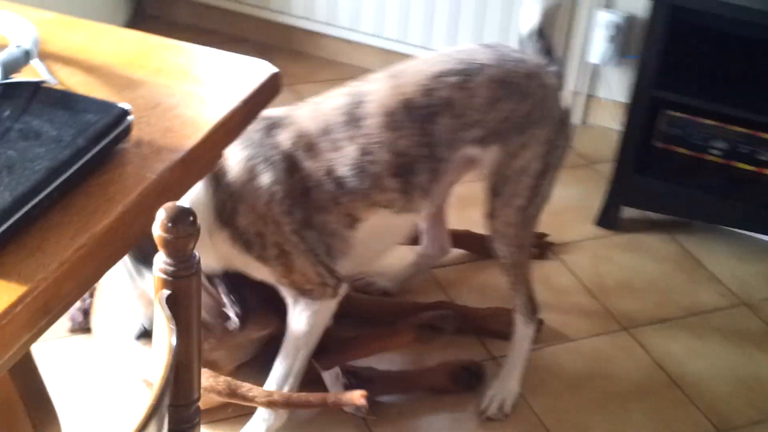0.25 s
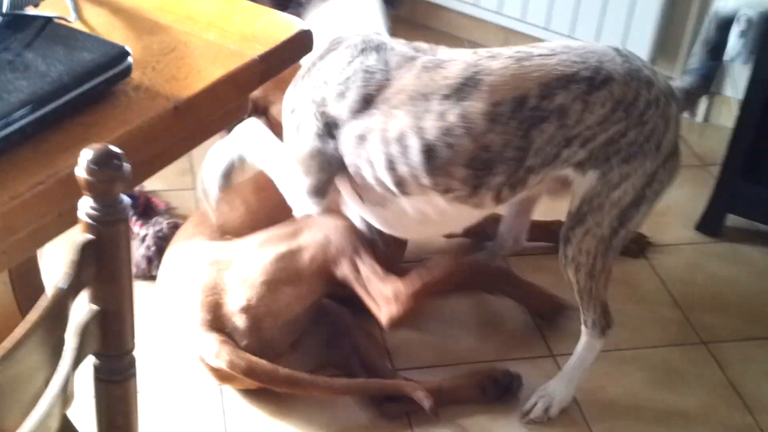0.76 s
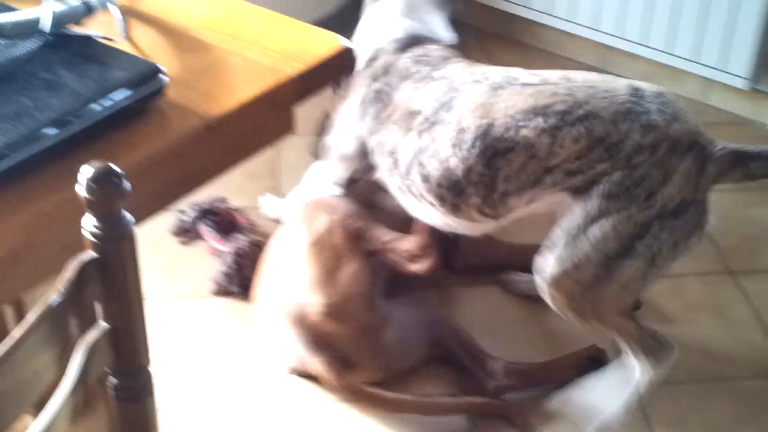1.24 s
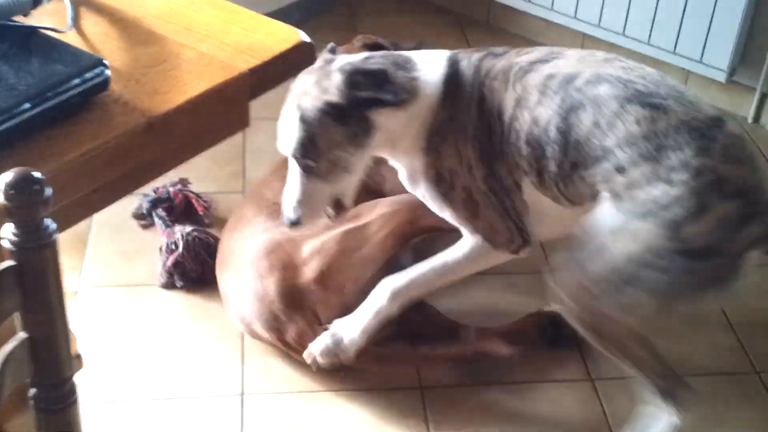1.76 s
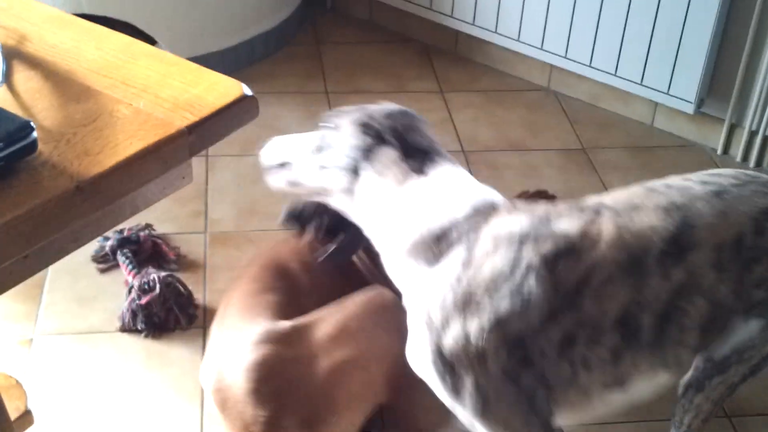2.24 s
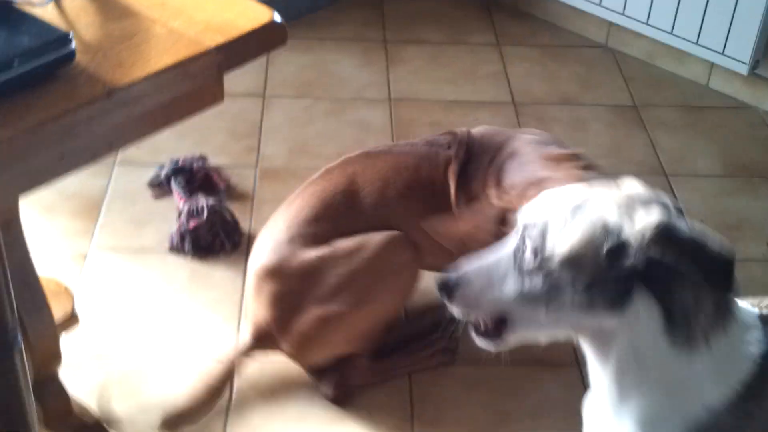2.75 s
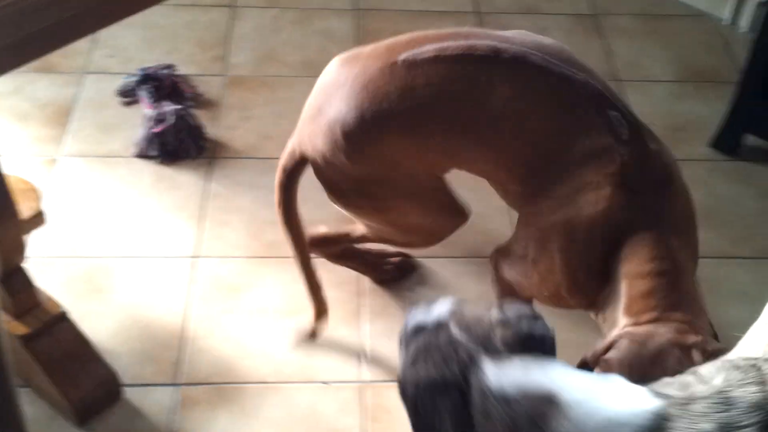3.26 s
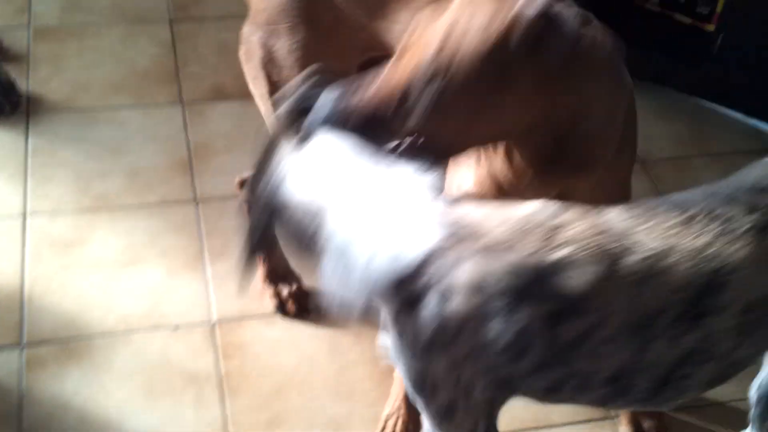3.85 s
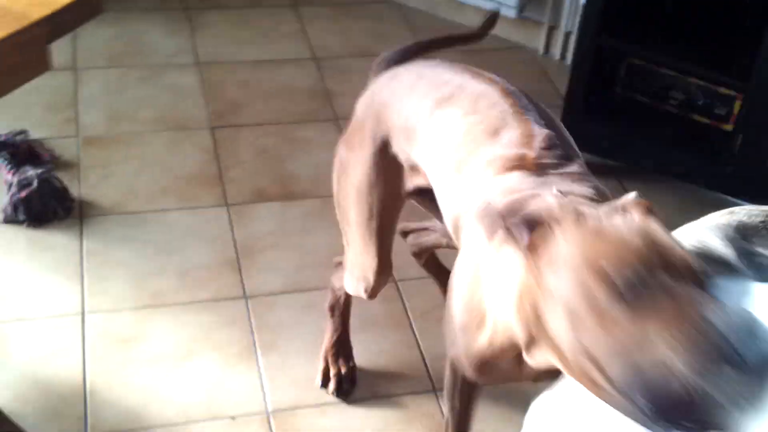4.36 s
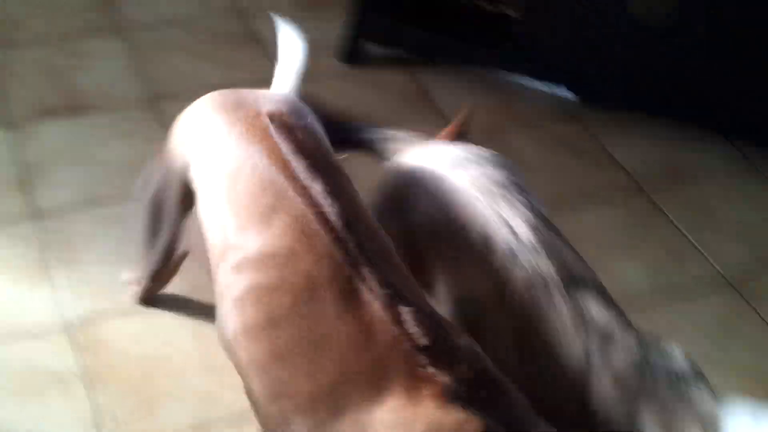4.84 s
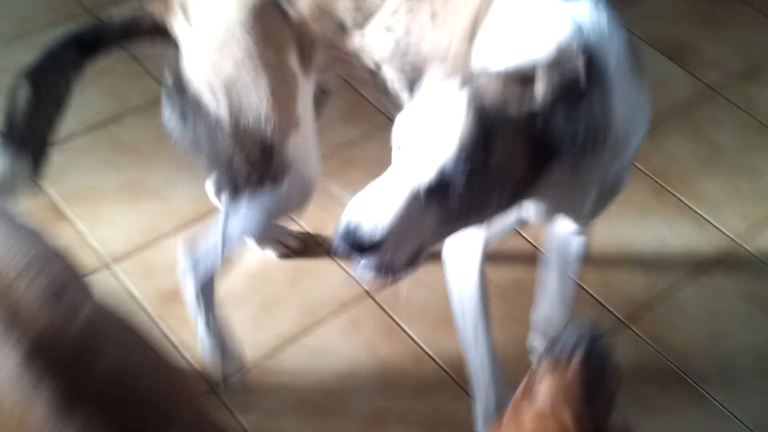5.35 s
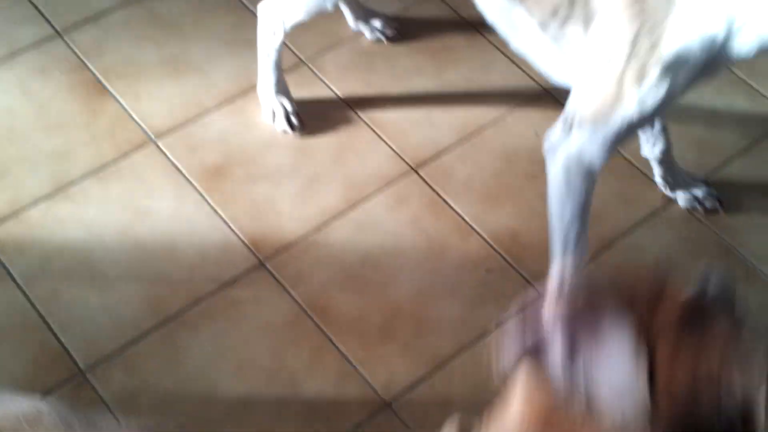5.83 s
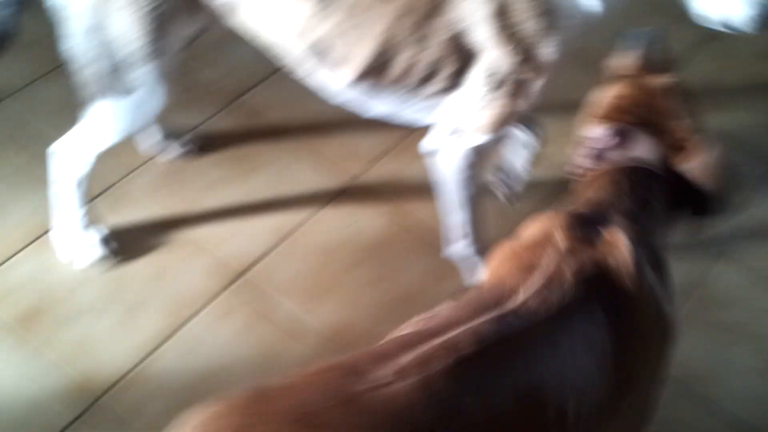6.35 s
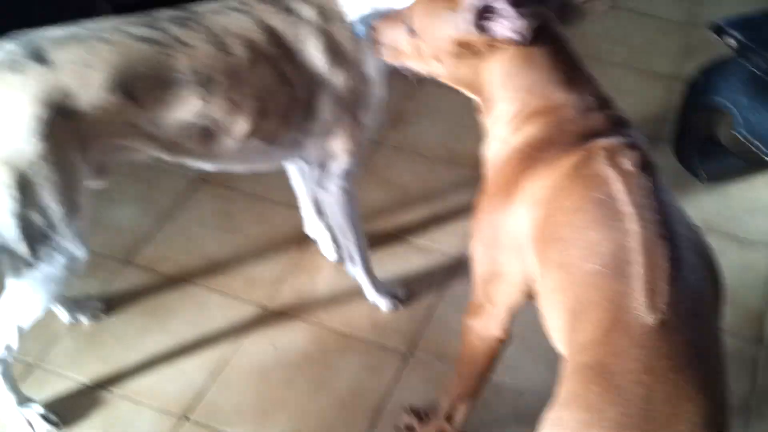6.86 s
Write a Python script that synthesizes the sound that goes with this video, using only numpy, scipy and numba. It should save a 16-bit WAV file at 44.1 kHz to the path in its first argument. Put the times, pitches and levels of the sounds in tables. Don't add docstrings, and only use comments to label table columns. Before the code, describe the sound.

Two dogs scuffle on a hard tiled floor, claws ticking and skidding, with low growls and one very loud, distorted bark late on.

```python
import sys
import numpy as np
from scipy import signal
from scipy.fft import rfft, irfft
from scipy.io import wavfile
from scipy.ndimage import uniform_filter1d
from numba import njit

SR = 44100
rng = np.random.default_rng(int(sys.argv[2]) if len(sys.argv) > 2 else 0)


def decibels_to_gain(level_db):
    exponent = np.asarray(level_db, float) / 20
    return 10 ** exponent


def unload_audio(sound):
    columns = np.transpose(np.atleast_2d(sound))
    steps = np.round(np.clip(columns, -1, 1) * 32767)
    wavfile.write(sys.argv[1], SR, steps.astype(np.int16))


N = 312974
TIME = np.arange(N) / SR


def unit(x):
    return x / np.sqrt(np.mean(x ** 2) + 1e-18)


@njit
def svf(x, hz, width):
    y, b, l = np.empty(len(x)), 0., 0.
    for i in range(len(x)):
        g, k = np.tan(np.pi * hz[i] / SR), width / hz[i]
        v = (b + g * (x[i] - l)) / (1 + g * (g + k))
        b, l, y[i] = 2 * v - b, l + 2 * g * v, k * v
    return y


def band(x, hz, width):
    return svf(x + 1e-18, np.clip(hz, 20, .45 * SR) + np.zeros(len(x)), float(width))


def steep(x, hz, width):
    return band(band(x, hz, width), hz, width)


def coloured(points, count):
    hz, db = np.transpose(points)
    gain = decibels_to_gain(np.interp(np.log(np.fft.rfftfreq(count, 1 / SR) + 1), np.log(hz), db))
    return irfft(rfft(rng.standard_normal(count)) * gain, count)


def flicker(rate):
    k = int(SR / rate)
    return uniform_filter1d(np.repeat(rng.standard_normal(N // k + 1), k), k)[:N]


def played(table, edge=.012):
    s, *columns = np.transpose(table)
    span = slice(int(s[0] * SR), int(s[-1] * SR))
    t = TIME[span]
    gate = np.clip(np.minimum(t - s[0], s[-1] - t) / edge, 0, 1)
    return span, gate, [np.interp(t, s, c) for c in columns]


def swell(start, peak, length, db, rise_db, fall_db):
    return [(start, db - rise_db), (start + peak, db), (start + length, db - fall_db)]


def humps(rows, fall_db):
    power = sum(decibels_to_gain(db - fall_db * np.abs(TIME - s) / half) ** 2 for s, db, half in rows)
    return np.sqrt(power)


def strikes(rows, ring, crackle_db=0):
    out = np.zeros(N + SR)
    t = TIME[:SR // 4]
    for s, db, hz, width, push in rows:
        grains = decibels_to_gain(crackle_db * rng.exponential(size=len(t) // 25)).repeat(25)
        burst = rng.standard_normal(len(t)) * grains * np.exp(-t / max(push, 1e-4))
        hit = ring(burst, hz, width)
        out[int(s * SR):][:len(t)] += decibels_to_gain(db) * hit / np.abs(hit).max()
    return out[:N]


# (start [s], length [s], level [dB], first mouth resonance [Hz], last mouth resonance [Hz])
BREATHS = [(0, 0.11, -55, 970, 920), (1.07, 0.28, -47.5, 923, 1180), (1.55, 0.15, -51, 840, 950),
           (2.1, 0.12, -38, 943, 854), (2.36, 0.041, -35.5, 940, 950), (2.394, 0.11, -31.5, 1040, 990),
           (2.47, 0.18, -37, 920, 940), (2.643, 0.14, -40, 950, 920), (2.76, 0.24, -46, 930, 880),
           (4.101, 0.28, -40, 1007, 1120), (4.598, 0.14, -36.5, 780, 826), (6.204, 0.12, -47.5, 1307, 1260),
           (6.682, 0.14, -50.5, 1050, 980)]


def pants():
    out = np.zeros(N)
    for start, length, db, first_hz, last_hz in BREATHS:
        course = swell(start, .45 * length, length, db, rise_db=3, fall_db=10)
        span, gate, (db,) = played(course, edge=0.018)
        hz = np.linspace(first_hz, last_hz, len(db))
        air = rng.standard_normal(len(db)) * decibels_to_gain(2.5 * flicker(60)[:len(db)])
        mouth = steep(air, hz, 340)
        moan = decibels_to_gain(-4) * steep(air, hz, 90)
        upper = decibels_to_gain(-4) * steep(air, 1.42 * hz, 380)
        throat = decibels_to_gain(-5.5) * steep(air, .55 * hz, 220)
        out[span] += unit(mouth + moan + upper + throat) * decibels_to_gain(db) * gate
    return out


# (time [s], effort [dB])
WRESTLING = [(0, -54), (.41, -78), (.65, -55.5), (.87, -61), (1.1, -50.5), (1.5, -53), (1.78, -39),
             (2.19, -49.5), (2.63, -44), (3.58, -47.5), (3.9, -46), (4.43, -46.5), (5.2, -47),
             (5.47, -32.5), (6.16, -64.5), (6.3, -50.5), (6.78, -47), (7.09, -65)]
# (fastest at [s], hiss level [dB], half length [s])
BODY_SLIDES = [(.8, -62, .15), (1.2, -34, 0.51), (1.84, -25, 0.16), (2.17, -33.5, 1), (2.63, -25, 0.2),
               (2.98, -32, 0.49), (3.125, -15, 0.06), (3.26, -23.5, 0.53), (3.82, -32.5, 0.44),
               (4.25, -30.5, 0.098), (4.78, -31.5, 0.34), (5.15, -28.5, 0.13), (5.47, -26, 0.65),
               (6.03, -29, 0.11), (6.34, -29.5, 0.17), (6.74, -32.5, 0.22)]
# (heaviest at [s], rumble level [dB], half length [s])
WEIGHT_SHOVES = [(1.32, -47, 0.33), (1.72, -33.5, 0.093), (2.9, -38.5, 0.59), (3.95, -34.5, 0.25),
                 (5.34, -17, 0.19), (6.34, -40, 0.13)]


def drag():
    effort = decibels_to_gain(np.interp(TIME, *np.transpose(WRESTLING)))
    sliding = np.hypot(humps(BODY_SLIDES, fall_db=17.5), decibels_to_gain(-4.5) * effort)
    weight = np.hypot(humps(WEIGHT_SHOVES, fall_db=19.5), decibels_to_gain(0.5) * effort)
    grain_db = 1.6 * rng.exponential(size=N // 40 + 1).clip(0, 6).repeat(40)[:N]
    grains = rng.standard_normal(N) * decibels_to_gain(grain_db)
    hiss = unit(steep(grains, 6000, 8000)) * sliding * decibels_to_gain(-12.5 + 2 * flicker(15))
    rub = unit(band(grains[::-1], 2110, 1400)) * effort * decibels_to_gain(-2.5 + 2 * flicker(21))
    floor = coloured([(20, -7.5), (60, -4.5), (200, -9.5), (500, -9.5), (1200, -12.5), (9000, -80.5)], N)
    rumble = unit(floor) * weight * decibels_to_gain(-2.0 + 0.5 * flicker(16.0))
    return hiss + rub + rumble


# (time [s], peak level [dB], ring [Hz], contact time [s])
LANDINGS = [(0.131, -49.5, 113, 0.029), (0.677, -51, 108, 0.052), (0.868, -44, 127, 0.055),
            (1.069, -78, 143, 0.025), (1.377, -35, 92, 0.031), (1.673, -28.5, 248, 0.15),
            (1.69, -28, 114, 0.037), (2.576, -31, 194, 0.07), (2.79, -32, 240, 0.063),
            (2.892, -32, 263, 0.09), (3.137, -26, 214, 0.058), (3.547, -58, 108, 0.028),
            (4.632, -33, 246, 0.091), (4.739, -30.5, 210, 0.0032), (4.845, -39, 196, 0.15),
            (5.748, -31.5, 275.2, 0.028), (6.298, -37.5, 144, 0.061), (6.329, -39, 161, 0.077),
            (6.468, -36.5, 288, 0.016)]


def thuds():
    return strikes([(s, db + 3.5, hz, 1.3 * hz, push) for s, db, hz, push in LANDINGS], steep)


# (time [s], peak level [dB])
CLAW_TAPS = [(.3008, -24.5), (1.0065, -43), (1.674, -15.5), (1.795, -10.5), (2.0425, -17), (2.5965, -13),
             (2.6228, -6), (3.143, -14), (3.7212, -12.5), (3.796, -19), (4.3763, -38), (4.396, -20.5),
             (4.4877, -40), (4.9534, -9.5), (5.0635, -11), (5.1346, -15.5), (5.487, -9), (5.5812, -2),
             (6.228, -8.5), (6.246, -13.5), (6.866, -17)]
# (time [s], tick peak level [dB], skid level [dB], skid length [s], brightness [dB])
PAW_STEPS = [(.5837, -27, -38.5, 0.1, -8), (.676, -18, -41, 0.012, -4), (1.0826, -31, -37, 0.019, -6),
             (1.2217, -17, -32.5, 0.052, -9), (1.3741, 11, -27.5, 0.05, -0.5),
             (1.8857, -12, -28.5, 0.039, -1), (2.3008, 6.5, -25, 0.04, -6), (2.5723, -15, -23, 0.015, -5),
             (2.7803, -17, -26, 0.006, -2), (2.786, -15, -17, 0.0023, -6), (2.8967, -4, -22.5, 0.0034, -2),
             (2.902, -12, -17.5, 0.0077, -3), (3.1336, -2, -16, 0.0038, -3), (3.206, -16, -25.5, 0.04, -5),
             (3.3915, -6, -22.5, 0.0054, -25), (3.4057, 6, -23, 0.07, -1.5),
             (3.808, -3.5, -31.5, 0.013, -18), (3.886, -7, -17, 0.0036, -6),
             (4.0443, -10, -23.5, 0.0035, -11), (4.6251, 9, -30, 0.024, -3),
             (4.6342, 10, -26.5, 0.018, -1.5), (4.7162, 8.5, -18, 0.0041, -9),
             (4.8201, -7, -27.5, 0.033, -1.5), (5.2913, -5.5, -20, 0.014, -23),
             (5.44, -27, -19, 0.038, 1.5), (5.7998, 0, -23, 0.03, -22), (6.2045, -8, -34.5, 0.096, -11),
             (6.5282, -28, -28.5, 0.044, -6), (6.5413, -29, -35, 0.12, -15)]
# (time [s], peak level [dB])
LATER_TOES = [(1.3791, 1), (1.3812, -5), (1.3848, -6), (1.3868, -7), (1.3926, -4), (1.4002, -7),
              (1.8832, -11), (2.3026, -4), (2.3044, -7), (2.308, -6), (2.3134, -5), (2.3158, -6),
              (2.3314, -5), (2.3369, -7), (2.5674, -11), (2.5737, -5), (2.5797, -5), (2.6263, -5),
              (2.6417, -8), (2.6549, -10), (2.7826, -1), (2.7881, 0), (2.7931, 1), (2.8996, 1),
              (2.9531, -6), (2.9589, -5), (2.9946, -8), (3.0749, -10), (3.0858, -11), (3.1354, 5),
              (3.1394, 4), (3.1548, -1), (3.3415, -10), (3.3932, -1), (3.4076, -4), (3.4179, 0),
              (3.4205, -3), (3.4398, -6), (3.2275, -2), (3.5085, -3), (3.8804, -4), (3.8908, -3),
              (3.8994, -2), (3.9835, -10), (4.0463, -7), (4.0578, -7), (4.0654, -8), (4.6303, -6),
              (4.6362, -6), (4.7186, 0), (4.7208, -6), (4.7931, -11), (4.8242, -7), (5.5851, -1),
              (5.8019, -2), (5.8093, -2), (6.5449, -8)]


def claws():
    claw_hz, spread_hz, tick_s = 5700, 120, .00025
    tap_skid_db, tap_skid_s, tap_bright_db = -20.5, 0.0046, -17
    taps = [(s, db, db + tap_skid_db, tap_skid_s, tap_bright_db) for s, db in CLAW_TAPS]
    rows = PAW_STEPS + taps
    ring_hz = claw_hz + spread_hz * rng.standard_normal(len(rows))
    tick_rows, skid_rows, bright_rows = [], [], []
    for (s, db, skid_db, skid_s, bright_db), hz in zip(rows, ring_hz):
        tick_rows.append((s, db - 14.5, hz, 5500, tick_s))
        skid_rows.append((s, skid_db + 7.5, 1.14 * hz, 5200, skid_s))
        bright_rows.append((s, skid_db + bright_db + 8, 10000, 5000, 0.83 * skid_s))
    ticks = strikes(tick_rows, band)
    ticks += strikes([(s, db - 12, claw_hz, 5500, tick_s) for s, db in LATER_TOES], band)
    skids = strikes(skid_rows, steep, crackle_db=3.5)
    skids += strikes(bright_rows, steep, crackle_db=6.0)
    return band(ticks, 7200, 8000), skids


# (time [s], peak level [dB], ring [Hz], width [Hz], t60 [s])
FURNITURE_KNOCKS = [(.63, -52, 402, 30, 0.22), (.709, -35, 440, 250, 0.23), (.709, -34.5, 824, 500, 0.25),
                    (.868, -38.5, 850, 400, 0.062), (1.553, -35.5, 870, 594, 0.28),
                    (1.631, -33.5, 946, 119, 0.025), (2.69, -27, 943, 148, 0.22),
                    (2.899, -25.5, 770, 597, 0.18), (3.545, -30, 716, 930, 0.31),
                    (3.792, -29.5, 1040, 150, 0.047), (4.12, -32.5, 1130, 60.6, 0.25),
                    (4.195, -32, 1210, 148, 0.23), (4.2, -32.5, 2410, 400, 0.25),
                    (4.23, -34, 1480, 400, 0.34), (4.195, -34, 1940, 250, 0.23),
                    (3.792, -33, 1850, 150, 0.08), (1.715, -37, 2050, 300, 0.15),
                    (1.839, -37, 2030, 300, 0.14), (2.107, -36.5, 1350, 150, 0.12),
                    (.59, -42, 2500, 2500, 0.39), (.76, -43, 605, 700, .3), (4.49, -31.5, 840, 300, 0.1),
                    (4.913, -30, 555, 684, 0.51), (5.13, -21, 836, 108, 0.071),
                    (6.3, -35.5, 500, 800, 0.28), (6.74, -36.5, 500, 198, 0.22)]


def knocks():
    rows = [(s, db, hz, 0.87 * width, t60 / np.log(1000)) for s, db, hz, width, t60 in FURNITURE_KNOCKS]
    return strikes(rows, steep)


# (time [s], peak level [dB], ring [Hz], length [s])
PAD_SCUFFS = [(0.709, -37.5, 2220, 0.011), (1.379, -30, 3800, 0.028), (2.298, -19.5, 3560, 0.027),
              (2.57, -15, 3600, 0.017), (2.907, -20.5, 2360, 0.037), (3.104, -18.5, 3480, 0.032),
              (3.561, -25.5, 2340, 0.014), (3.898, -25.5, 3860, 0.02), (4.042, -20.5, 3770, 0.064),
              (4.631, -23.5, 2200, 0.0044), (4.718, -17, 3430, 0.0058), (4.854, -32, 3280, 0.0062),
              (4.906, -27, 3800, 0.017), (5.801, -27, 3017, 0.048), (6.198, -29, 3400, 0.043),
              (6.528, -26, 3900, 0.022)]


def scuffs():
    return strikes([(s, db, hz, 1.7 * hz, push) for s, db, hz, push in PAD_SCUFFS], steep, crackle_db=4.0)


# (time [s], level [dB], ring [Hz])
SLAB_BOOMS = [(.75, -53, 62), (1.38, -43, 68), (2.58, -31.5, 51.3), (2.8, -35, 69), (3.15, -33, 50),
              (3.5, -49, 54.6), (4.851, -36, 53.4), (5.56, -37, 55.7), (5.801, -37.5, 49.5),
              (6.324, -25, 53.6)]


def booms():
    t60_s, swell_s = 0.39, 0.036
    out = np.zeros(N)
    for s, db, hz in SLAB_BOOMS:
        t = np.clip(TIME - s, 0, 2)
        fade = decibels_to_gain(db + 6.5 - 60 * t / t60_s)
        out += fade * (1 - np.exp(-t / swell_s)) * np.sin(2 * np.pi * hz * t)
    return out


def folds(hz, rough, half):
    length_chance, size_chance, breath = rng.standard_normal((len(hz), 3)).T
    wobble = uniform_filter1d(np.repeat(length_chance, 200)[:len(hz)], 200)
    phase = np.cumsum(hz * (1 + 0.2497 * rough * wobble)) / SR
    cycle = phase.astype(int)
    pairs = 1 + np.clip(half, 0, 1) * (-1.) ** cycle
    size = decibels_to_gain(10 * rough * size_chance[cycle]) * pairs
    pulses = np.diff(cycle, prepend=0) * size * np.sqrt(SR / hz)
    return pulses + .9 * rough * breath * np.exp(-(phase % 1) / .4)


# (frequency [Hz], width [Hz], level [dB])
CLOSED_THROAT = [(395, 79, 12.5), (500, 55, 1.5), (643, 200, 3), (1040, 75, -6), (2030, 660, -10)]


def growl(hz, db, open_db, rough, half, tract=CLOSED_THROAT):
    source = folds(hz, np.clip(rough, 0, 1), half)
    half_pitch = decibels_to_gain(4) * steep(source, hz / 2, 40) - decibels_to_gain(-4) * steep(source, 3 * hz / 2, 68)
    chest = steep(source, hz, 95) + np.clip(half, 0, 1) * half_pitch
    throat = sum((-1) ** k * decibels_to_gain(g) * steep(source, f, 0.45 * w) for k, (f, w, g) in enumerate(tract))
    lumps = 1.8 * flicker(32)[:len(hz)]
    return unit(chest - decibels_to_gain(open_db) * throat) * decibels_to_gain(db + lumps)


# (start [s], loudest after [s], length [s], level [dB], first pitch [Hz])
LOW_GRUMBLES = [
    (0.859, 0.0044, 0.46, -52.5, 132.7),
    (1.278, 0.2, 0.34, -43.5, 158.1),
    (2.009, 0.073, 0.223, -35, 152),
]


def grumbles():
    rest_hz, settle_s = 127, 0.12
    out = np.zeros(N)
    for start, peak, length, db, first_hz in LOW_GRUMBLES:
        span, gate, (db,) = played(swell(start, peak, length, db, rise_db=4, fall_db=22))
        settled = np.exp(-(TIME[span] - start) / settle_s)
        hz = rest_hz + (first_hz - rest_hz) * settled
        out[span] += growl(hz, db, open_db=-24.5, rough=.36, half=0.83 * settled) * gate
    return out


# (time [s], pitch [Hz], level [dB], mouth opening [dB])
SHORT_GROWLS = [
    [(1.655, 225, -34, -5), (1.69, 222.2, -30, -5), (1.712, 201.6, -37.5, -0.5), (1.732, 173.7, -32, -8),
     (1.765, 168, -24.5, -12), (1.815, 168.3, -40, -5), (1.854, 169, -24, -10.5), (1.92, 171.5, -44.5, -3),
     (1.97, 166, -38, -2)],
    [(5.12, 160, -28, -13), (5.158, 174.5, -35, -12.5), (5.19, 203.6, -35.5, -7.5), (5.235, 228, -27, -28),
     (5.285, 221, -35, -15)],
]
# (frequency [Hz], width [Hz], level [dB])
WIDE_THROAT = [(430, 96, 0), (500, 82, 4.5), (650, 230, 3.5), (1052, 380, 2.5), (1550, 500, -5),
               (2090, 550, -5), (2700, 850, -9.5)]


def short_growls():
    roughness, pairing = (.22, .08), (.12, .1)
    out = np.zeros(N)
    for call, rough, half in zip(SHORT_GROWLS, roughness, pairing):
        span, gate, (hz, db, open_db) = played(call)
        out[span] += growl(hz, db, open_db, rough, half, WIDE_THROAT) * gate
    return out


# (time [s], pitch [Hz], level [dB], mouth opening [dB])
DRAWN_GROWL = [(3.79, 162.5, -41, -10), (3.86, 170.9, -35, -4.5), (3.93, 168.8, -35, -1.5),
               (4.0, 184, -33.5, -17), (4.07, 188.3, -34.5, -13), (4.105, 195.4, -23.5, -17.5),
               (4.14, 181, -32, -13.5), (4.2, 172.6, -25, -20), (4.32, 164, -52, -11)]


def long_growl():
    throb_from_s, throb_hz, pairs_fade_s = 4.13, 40, .04
    out = np.zeros(N)
    span, gate, (hz, db, open_db) = played(DRAWN_GROWL)
    t = TIME[span]
    pairs = .7 * np.clip((throb_from_s - t) / pairs_fade_s, 0, 1)
    throb = np.cos(np.pi * throb_hz * np.clip(t - throb_from_s, 0, 1))
    out[span] += growl(hz, db, open_db, rough=.32, half=pairs) * throb * gate
    return out


# (time [s], pitch [Hz], level [dB], main mouth resonance and cry pitch [Hz], cry level [dB])
BARK_COURSE = [(5.255, 210.8, -36, 650, -7), (5.29, 213, -16.5, 640.1, -11), (5.305, 215, -1.5, 632.4, -6),
               (5.312, 175.7, -2, 525.5, -2), (5.362, 171.9, -1.5, 520, -1.5), (5.372, 190, -3, 392, -3.5),
               (5.43, 189.7, -8.5, 395.5, -1), (5.445, 170, -7, 517, 5.5), (5.475, 168, -27, 513, -0.5)]
# (frequency [Hz], width [Hz], level [dB])
BARK_RESONANCES = [(305, 86, 3.5), (520, 126, -11), (708, 140, -11), (1027, 184, -10), (1515, 650, -22.5),
                   (2393, 560, -24)]
CRY_OVERTONES = [0, -14, -19, -25, -15]


def bark():
    rough, hoarser_per_s, rasp_db = .15, 1.0, -10
    out = np.zeros(N)
    span, gate, (hz, db, mouth_hz, cry_db) = played(BARK_COURSE, edge=0.0096)
    count = len(hz)
    rough = rough + hoarser_per_s * (TIME[span] - TIME[span][0])
    source = folds(hz, np.clip(rough, 0, 1), 0)
    voice = steep(source, mouth_hz, 156)
    for k, (f, width, g) in enumerate(BARK_RESONANCES):
        voice = voice + (-1) ** k * decibels_to_gain(g) * steep(source, f, 0.87 * width)
    rasp = band(rng.standard_normal(count), 3400, 6400)
    phase = 2 * np.pi * np.cumsum(mouth_hz * (1 + .012 * flicker(150)[:count])) / SR
    cry = sum(decibels_to_gain(g) * np.sin((k + 1) * phase) for k, g in enumerate(CRY_OVERTONES))
    cry = decibels_to_gain(cry_db + 3.0 * flicker(90)[:count]) * cry
    out[span] = (unit(voice) + cry + decibels_to_gain(rasp_db - 11.5) * unit(rasp)) * decibels_to_gain(db) * gate
    return out


# (frequency [Hz], t60 [s])
REVERB = [(40, 0.84), (150, 0.75), (400, 0.72), (1000, 0.86), (3000, 0.49), (6500, 0.52), (11000, 0.41)]
# (frequency [Hz], level [dB], t60 [s])
STANDING_WAVES = [(300, -56.5, 0.22), (521.5, -61.5, 0.5), (373, -67, .35)]
# (delay [s], level [dB])
WALL_ECHOES = [(.0052, -3), (.0078, -9), (.0108, -7), (.0131, -8), (.019, -8), (.0262, -9)]


def room(x):
    t = TIME[:int(1.2 * SR)]
    hz, t60 = np.transpose(REVERB)
    tail = np.zeros(len(t))
    for f in 40 * 2. ** np.arange(0, 8.6, .5):
        band_t60 = np.interp(np.log(f), np.log(hz), t60)
        tail += band(rng.standard_normal(len(t)), f, .7 * f) * decibels_to_gain(-60 * t / band_t60)
    tail *= (1 - np.exp(-t / 0.0093)) / np.sqrt(np.sum(tail ** 2))
    for f, db, ring in STANDING_WAVES:
        tail += decibels_to_gain(db) * np.sin(2 * np.pi * f * t) * decibels_to_gain(-60 * t / ring)
    for k, (s, db) in enumerate(WALL_ECHOES):
        tail[int(s * SR)] += decibels_to_gain(db - 8) * (-1) ** k
    return signal.fftconvolve(x, tail)[:N]


def scene():
    breath_and_bodies = decibels_to_gain(-2.5) * pants() + drag() + thuds() + knocks()
    ticks, skids = claws()
    skids = skids + scuffs()
    boom = booms()
    voice = grumbles() + short_growls() + long_growl()
    others = breath_and_bodies + bark()
    direct = ticks + decibels_to_gain(-0.5) * skids + boom + voice + others
    to_walls = decibels_to_gain(-21.5) * ticks + skids + decibels_to_gain(-13) * voice + decibels_to_gain(-7.0) * others
    return (direct + room(to_walls))[None]


def top_cut(x):
    return signal.sosfilt(signal.butter(12, 15810, fs=SR, output="sos"), x)


# (frequency [Hz], width [Hz], level [dB])
MIC_PORT = [(6730, 2200, 2)]
# (frequency [Hz], level per Hz [dB])
ROOM_TONE = [(15, -34), (25, 8), (340, 2.5), (397, 5), (1170, -4), (1440, 0), (3560, -3), (6620, 2.5),
             (12000, -8.5), (15600, -42), (22000, -120)]


def record(dry):
    room_tone_db, overload = -54.5, .69
    x = dry[0] + sum(decibels_to_gain(db) * band(dry[0], hz, width) for hz, width, db in MIC_PORT)
    x = x + decibels_to_gain(room_tone_db) * unit(coloured(ROOM_TONE, N))
    x = signal.sosfilt(signal.ellip(10, .3, 70, 11860, fs=SR, output="sos"), x)
    x = signal.sosfilt(signal.butter(1, 22, "high", fs=SR, output="sos"), x)
    x = np.clip(x, -overload, overload)
    x = signal.sosfilt(signal.butter(2, 12500, fs=SR, output="sos"), x)
    return top_cut(x[None])


dry = scene()
out = record(dry)
unload_audio(out)
```